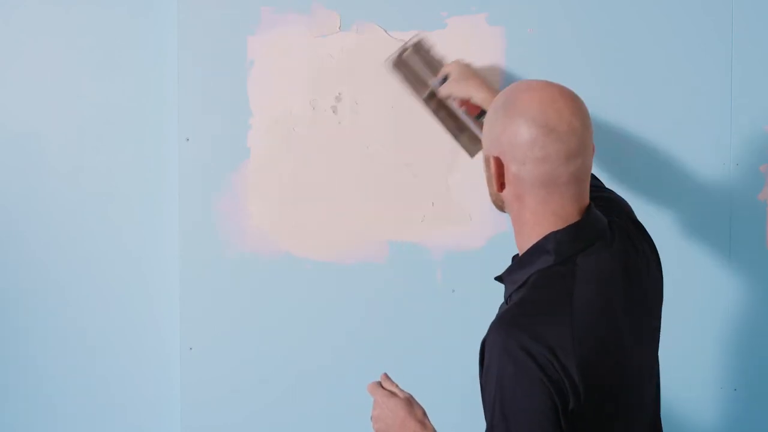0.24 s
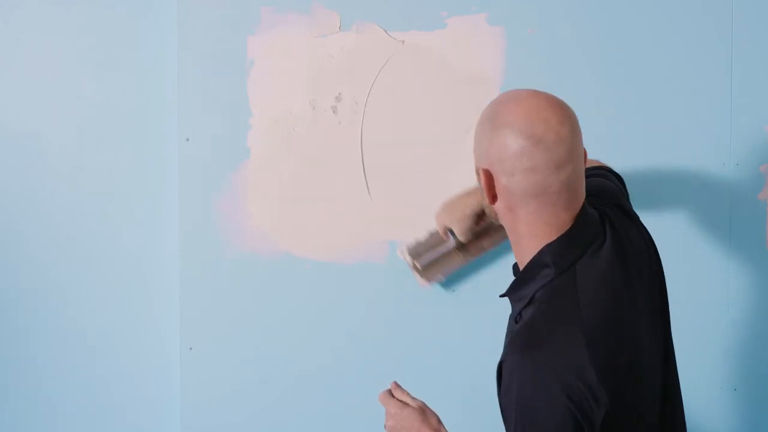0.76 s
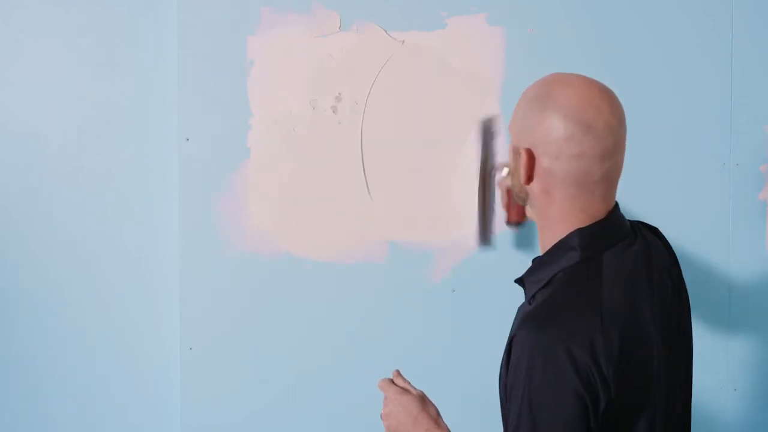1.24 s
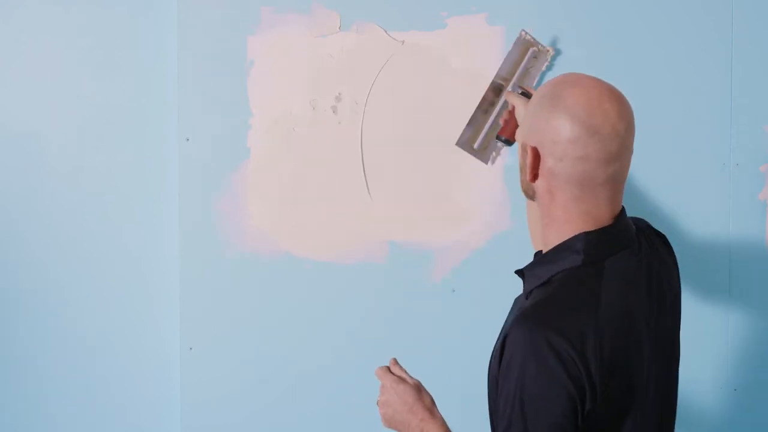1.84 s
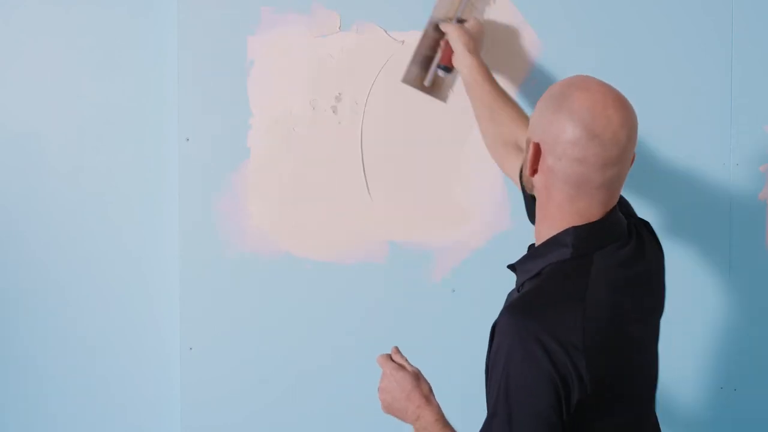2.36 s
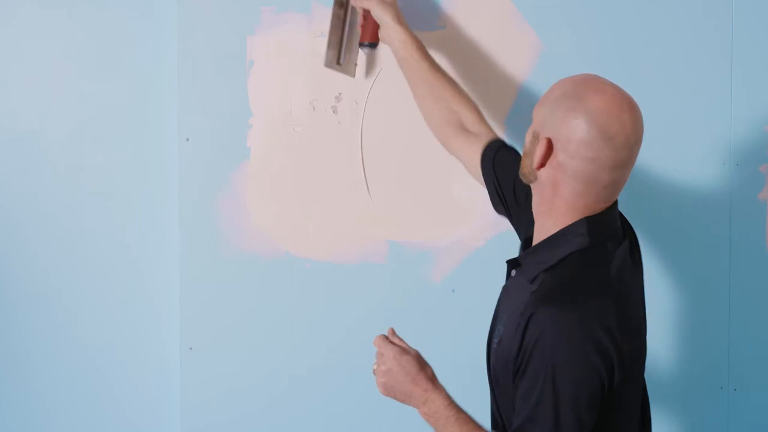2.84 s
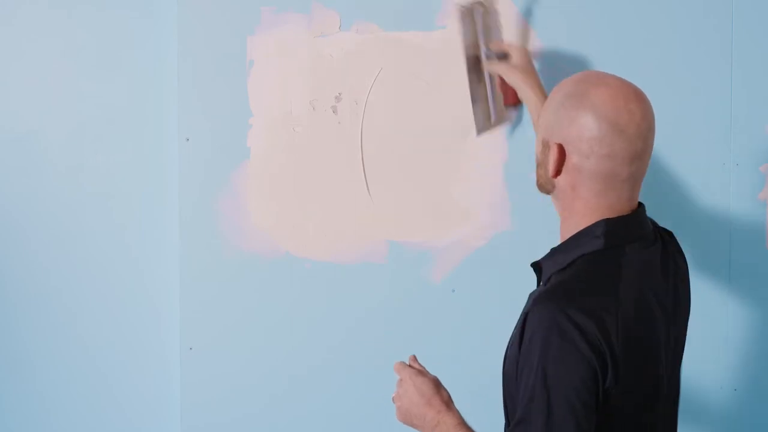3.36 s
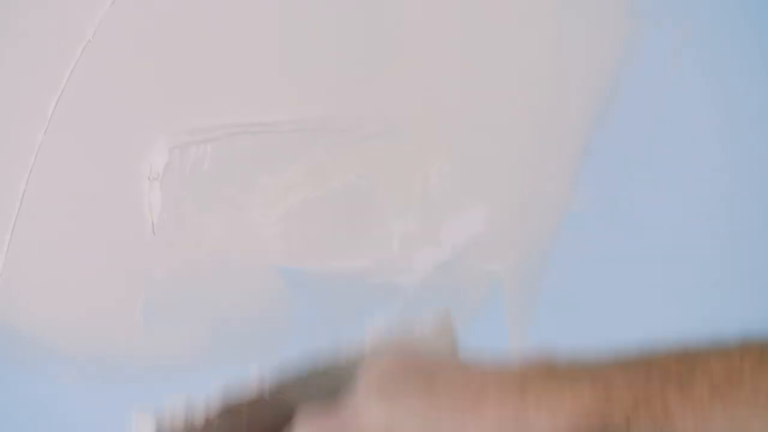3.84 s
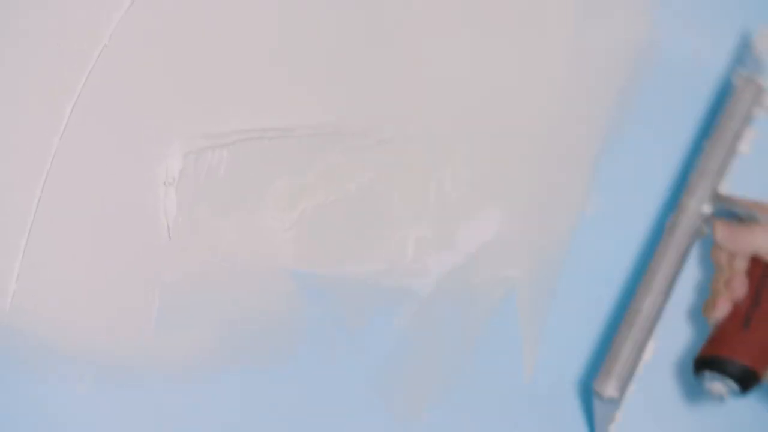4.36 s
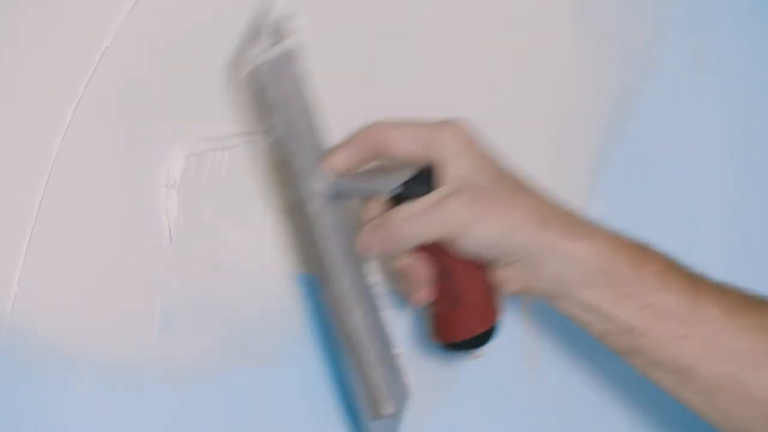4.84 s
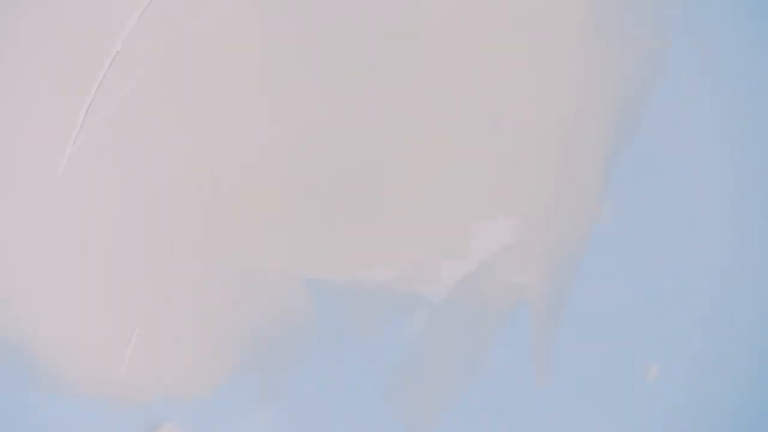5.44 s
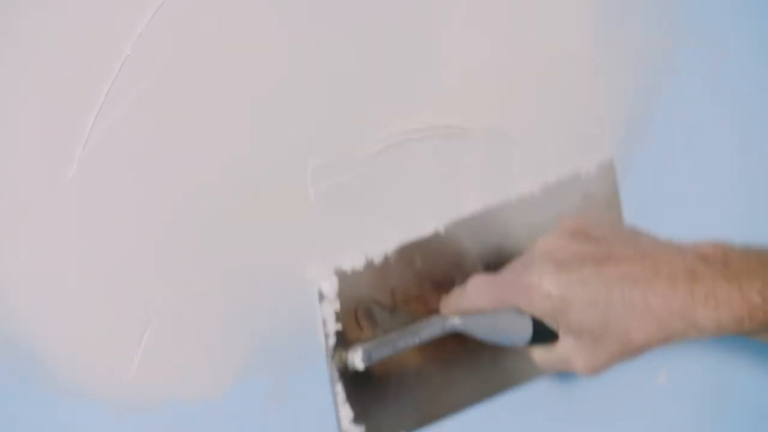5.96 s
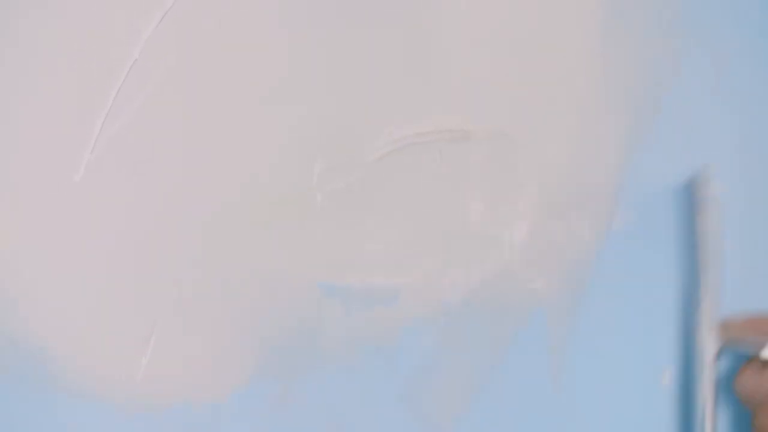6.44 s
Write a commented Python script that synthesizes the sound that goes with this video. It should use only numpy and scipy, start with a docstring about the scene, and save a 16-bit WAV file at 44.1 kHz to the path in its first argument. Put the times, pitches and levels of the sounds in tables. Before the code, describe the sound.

A steel trowel spreads wet plaster over a plasterboard wall, heard in mono in a bare room with short reverberation. It opens with a firm, gritty scrape that rings the blade slightly. Tiny squeaks follow from 0.6 to 0.9 seconds, and a lighter double scrape comes around 1 second. After a lull with faint bubble ticks, the blade clacks on the wall at about 2 seconds and glides softly. A bright rasp with a small squeak comes at 2.7 seconds, then dull board thuds at 2.8 and 3.7. The work gets busier, with strong short scrapes near 4, 4.6, 5.3 and 6.3 seconds and quieter wet glides between. A clack with a hollow rumble lands at 4.5 seconds, a soft thud at 5.9, and a sharp clack with a brief scrape at 6.7. A low ventilation murmur and a very faint electrical whine run underneath.

```python
"""A bare room, where a steel trowel spreads wet joint compound over a plasterboard wall.
Each stroke drags fine grit under the blade; the rasp rings the steel and the wedge of air beneath it.
The blade clacks as it lands, the board thuds and drums, the edge squeaks and small bubbles pop in
the paste. Behind it all sits a low ventilation murmur with a faint electrical whine."""
import sys
import numpy as np
from scipy import signal
from scipy.fft import rfft, irfft, next_fast_len
from scipy.io import wavfile
from scipy.ndimage import map_coordinates

SR = 44100
rng = np.random.default_rng(int(sys.argv[2]) if len(sys.argv) > 2 else 0)


def int16_out(signal):
    """Quantize to a 16-bit WAV file."""
    q = np.round(np.clip(np.atleast_2d(signal).T, -1, 1) * 32767)
    wavfile.write(sys.argv[1], SR, q.astype(np.int16))


N = 295029

# Ringing modes of the steel blade: pitch_hz, level_db, t60_s
BLADE_MODES = [(460, -3, 0.036), (695, -5.5, 0.1), (898, -11, .08), (1099, 1.5, 0.089), (1206, -1, 0.14),
               (1280, -19.5, .07), (1770, -18, .04), (2365, -13, 0.1), (2920, -8, 0.085),
               (3150, -9.5, 0.034), (3800, -10.5, .03), (4600, -13, .03), (5810, -28, .03)]
# The blade bumps the wall: time_s, steel_db, board_db, rise_s, corner_db (re the main blow), drum_db
LANDINGS = [(1.68, -56, -55.5, 0.00063, -18.5, -80.5), (1.9576, -27, -34.5, .0005, -10.5, -46.5),
            (2.818, -56.5, -36, 0.0042, -5.5, -51.5), (3.654, -66, -36, 0.0037, -1.5, -55.5),
            (4.473, -33, -47.5, .002, -12, -38), (5.905, -57.5, -32, 0.0015, -12, -51.5),
            (6.654, -21.5, -43.5, 0.00077, -21.5, -48)]


def amp(db):
    """Decibels to gain."""
    return 10 ** (np.asarray(db) / 20)


def unit(x):
    """Scale to rms 1."""
    return x / np.sqrt(np.mean(x ** 2) + 1e-20)


def along(points, hz):
    """Read a curve of (freq_hz, value) points on a log frequency axis."""
    freqs, values = np.transpose(points)
    return np.interp(np.log(hz + 1), np.log(freqs), values)


def wobble(rate):
    """A smooth random curve, rate knots a second."""
    return map_coordinates(rng.standard_normal(int(N * rate / SR) + 4), [np.arange(N) * rate / SR])


def filtered(x, response):
    """Filter x by a gain given as a function of frequency."""
    size = next_fast_len(N + SR // 2)
    return irfft(rfft(x, size) * response(np.fft.rfftfreq(size, 1 / SR)), size)[:N]


def noise(spectrum):
    """Coloured noise of rms 1."""
    return unit(filtered(rng.standard_normal(N), lambda hz: amp(along(spectrum, hz))))


def add(track, start_s, sound):
    """Mix a sound into a track."""
    part = track[round(start_s * SR):][:len(sound)]
    part += sound[:len(part)]


def scrape(body_hz=1650, fizz_hz=7000):
    """Grit under the blade: wet glides are quiet and fizzy, a biting edge is loud and full-bodied."""
    # Trowel strokes: full_pressure_s, swell_s, hold_s, rasp_db, change_db (over the hold),
    # body_db and fizz_db (both re the rasp), wedge_hz, grip
    strokes = [ (0.0, .02, 0.016, -44.5, -6, 11, -12.5, 1000, "firm"),
               (0.141, 0.091, .135, -18, -16.5, -5, -7, 960, "firm"),
               (0.419, .1, 0.15, -63, 2, -3, -3, 1000, "light"),
               (0.569, 0.022, 0.24, -55.5, 12, -1, -3.5, 990, "light"),
               (0.859, 0.14, 0.078, -29.5, -15, -12, -0.5, 1050, "light"),
               (0.984, 0.14, 0.017, -30.5, 1.5, -7, -13, 1000, "light"),
               (1.941, 0.023, .012, -50.5, 1.5, 7.5, -14.5, 1100, "low"),
               (2, .025, 0.12, -37.5, -18.5, -3, -3, 1010, "light"),
               (2.133, .05, 0.31, -58.5, -9, -2.5, -0.5, 960, "light"),
               (2.439, .045, 0.14, -54, -8, -8, 3.5, 950, "light"),
               (2.623, 0.063, 0.19, -39, -7, -6.5, 3.5, 855, "steep"),
               (2.703, 0.056, 0.1, -21.5, 3.5, -10, -22, 850, "steep"),
               (2.995, 0.11, .27, -65, -5.5, 3, 2.5, 940, "light"),
               (3.449, .008, 0.12, -54.5, -16.5, -6.5, -10, 950, "low"),
               (3.81, 0.26, 0.058, -59, 7, -27, 4, 1100, "flat"),
               (3.924, .058, 0.059, -27, -5.5, -18, -.5, 985, "flat"),
               (4.026, .064, .022, -16, -2, -4.5, -12, 760, "flat"),
               (4.47, 0.01, 0.055, -34.5, 3, 6, -10.5, 900, "firm"),
               (4.555, 0.069, 0.085, -22.5, -.5, -3.5, -5, 850, "firm"),
               (4.679, 0.047, 0.11, -37.5, -8, -4.5, -12, 760, "firm"),
               (4.8, 0.039, 0.02, -37.5, -4, 1, -4.5, 770, "firm"),
               (5, 0.2, 0.45, -39, -13.5, -2, -6.5, 1030, "low"),
               (5.323, 0.084, 0.051, -20, -1, -11, -17.5, 1190, "low"),
               (5.477, 0.077, 0.31, -58, -18, 6, -0.5, 1000, "light"),
               (6.053, 0.092, .06, -52, -32, -18, 3, 980, "flat"),
               (6.232, 0.14, 0.06, -31, -4.5, -39, 2, 935, "flat"),
               (6.298, 0.066, 0.025, -19.5, -1.5, -2, -12, 874, "flat"),
               (6.685, 0.057, .03, -40.5, -1.5, 9, -2, 800, "firm")]
    # Tone of the scrape for each way of holding the blade: freq_hz, level_db
    firm = [(180, -41.5), (300, -19.5), (493, -26), (622, -6), (825, 0), (1170, -0.5), (1630, -4.5),
            (2200, -1.5), (2630, -6), (3160, -3.5), (4120, -7), (6350, -9.5), (7620, -14), (11200, -15),
            (15800, -32)]
    light = [(180, -46), (300, -16.5), (331, -22), (447, -15), (510, -21), (676, -4), (812, -14.5),
             (1060, -7.5), (1470, -7), (1710, -1), (2350, -3), (3160, 0.5), (7250, -5), (10100, -5),
             (15800, -19)]
    steep = [(180, -38), (300, -35.5), (411, -42), (454, -13.5), (493, -36), (622, -15), (1330, -13.5),
             (1400, -8.5), (1830, -13.5), (2270, -6), (3440, -11), (3730, -5.5), (5840, -3.5),
             (11500, -24.5), (15800, -35)]
    flat = [(180, -71), (300, -27), (385, -49.5), (493, -27.5), (723, -4.5), (785, -4.5), (853, -12),
            (958, -10), (1380, -3), (1580, -8), (2310, -0.5), (3490, -2.5), (3860, -0.5), (9770, -9.5),
            (15800, -31)]
    low = [(180, -52), (300, -17), (462, -12), (747, 1.5), (958, -4.5), (1020, -4), (1170, 2), (1770, -7),
           (2050, -3), (2390, -5.5), (3060, -6), (5650, -6), (10400, -18.5), (12500, -27), (15800, -38)]
    # Each grip: colour, lift_db of the air wedge's resonances
    grips = dict(firm=(firm, 1.5), light=(light, 2.5), steep=(steep, 1.6),
                 flat=(flat, 6.8), low=(low, 2.1))
    drag = grit(grains_per_s=4500, grain_db=-2.5, judder_db=0.42)
    hz, t, spectrum = signal.stft(drag, SR, nperseg=512, noverlap=384)
    hz = hz[:, None] + 1
    body = 1 / (1 + (hz / body_hz) ** 10)
    fizz = 1 / (1 + (fizz_hz / hz) ** 10)
    rasp = np.abs(1 - body - fizz)
    scoop_db = -5 * bell(hz, centre_hz=1620, octaves=0.2)
    power = np.zeros(spectrum.shape)
    for full_s, swell_s, hold_s, rasp_db, change_db, body_db, fizz_db, wedge_hz, grip in strokes:
        colour, lift_db = grips[grip]
        age = t - full_s
        level_db = rasp_db + pressure_db(age, swell_s, hold_s, change_db)
        on = level_db > -90
        tilt = np.clip(age[on] / (swell_s + hold_s), -1, 1)
        tone = amp(along(colour, hz) + lift_db * air_wedge(hz, wedge_hz, tilt) + scoop_db) ** 2
        for zone, zone_db in ((body, body_db), (rasp, 0), (fizz, fizz_db)):
            band = zone * tone
            power[:, on] += band / np.mean(band, axis=0) * amp(level_db[on] + zone_db) ** 2
    return signal.istft(spectrum * np.sqrt(power), SR, nperseg=512, noverlap=384)[1][:N]


def grit(grains_per_s, grain_db, judder_db):
    """Particles catch under the edge over a smooth smear; the drag judders."""
    grains = (rng.random(N) < grains_per_s / SR) * rng.standard_normal(N)
    smear = rng.standard_normal(N)
    judder = amp(judder_db * wobble(260) + 1.2 * wobble(45))
    return unit((smear + amp(grain_db) * unit(grains)) * judder)


def pressure_db(age, swell_s, hold_s, change_db, swell_db=21, lift_off_db_per_s=519):
    """A stroke swells until age 0, eases or bears down through the hold, then leaves the wall."""
    swell = swell_db * (np.maximum(-age, 0) / swell_s) ** 1.235  # rounds off towards full pressure
    hold = change_db * np.clip(age / hold_s, 0, 1)
    lift_off = lift_off_db_per_s * np.maximum(age - hold_s, 0)
    return hold - swell - lift_off


def bell(hz, centre_hz, octaves):
    """A bell curve of height 1 on a log frequency axis."""
    return np.exp(-.5 * (np.log2(hz / centre_hz) / octaves) ** 2)


def air_wedge(hz, wedge_hz, tilt, fall_octaves=0.38, width_octaves=0.12):
    """The air under the blade has two resonances with a null between; all fall as the blade tilts."""
    lower_hz = wedge_hz * 2 ** (-fall_octaves * tilt)
    upper_hz = 2.95 * lower_hz  # as in a tube closed at one end
    resonances = bell(hz, lower_hz, width_octaves) + bell(hz, upper_hz, width_octaves)
    return resonances - bell(hz, 1.9 * lower_hz, width_octaves)


def blade_ring(drive):
    """The steel's modes, kept ringing by the scrape."""
    def resonance(hz, pitch_hz, t60_s):
        width_hz = np.log(1000) / (np.pi * t60_s)
        loss = 1j * hz * width_hz
        return loss / (pitch_hz ** 2 - hz ** 2 + loss)
    return filtered(drive, lambda hz: sum(amp(db) * resonance(hz, pitch_hz, t60_s)
                                          for pitch_hz, db, t60_s in BLADE_MODES))


def landings():
    """The blade clacks on the wall with a wet slap and the board thuds, four quick contacts each time."""
    # Modes of the plasterboard: pitch_hz, level_db, t60_s
    board_modes = [(90, -11.5, 0.12), (110.4, -5.5, 0.37), (145.2, -3.5, 0.15), (188, -8.5, 0.051),
                   (207, -2.5, 0.12), (278, -13.5, 0.086), (359, -18, 0.039)]
    out, t = np.zeros(N), np.arange(SR // 3) / SR

    def burst(band_hz, level_db, t60_s):
        hiss = signal.lfilter(*signal.butter(3, band_hz, "band", fs=SR), rng.standard_normal(len(t)))
        return unit(hiss) * amp(level_db - 60 * t / t60_s)

    for time_s, steel_db, board_db, edge_rise_s, corner_db, _ in LANDINGS:
        contacts = [(-.022, corner_db, .0025),  # one corner touches first
                    (0, 0, edge_rise_s),  # the whole edge
                    (.0045, -5, edge_rise_s),  # the heel follows
                    (.033, -13.5, edge_rise_s)]  # the rebound
        for delay_s, contact_db, rise_s in contacts:
            slap = burst(band_hz=(983, 4300), level_db=-4, t60_s=0.026)
            knock = burst(band_hz=(203, 623), level_db=0.5, t60_s=0.06)  # handle and board face
            clack = struck(BLADE_MODES, t, attack_s=.0003, damping=2.8) + slap + knock
            thud = struck(board_modes, t, attack_s=.00085, damping=2.1)
            onset = 1 - np.exp(-(t / rise_s) ** 2)  # paste cushions the contact
            blow = amp(steel_db) * clack + amp(board_db) * thud
            add(out, time_s + delay_s, amp(contact_db) * onset * blow)
    return out


def struck(modes, t, attack_s, damping):
    """Modes rung at new strengths by each blow; paste and hand shorten their decay."""
    ring = np.zeros(len(t))
    for pitch_hz, level_db, t60_s in modes:
        decay = amp(level_db + rng.normal(0, 1.0) - 60 * damping * t / t60_s)
        ring += decay * np.sin(2 * np.pi * (pitch_hz * t + rng.random()))
    return ring * (1 - np.exp(-t / attack_s))


def drumming(delay_s=.025, rise_s=.023, fade_db_per_s=90.5):
    """The hollow wall rumbles as the arm's weight arrives just after each landing, then settles."""
    # Tone of the wall's rumble: freq_hz, level_db
    rumble_colour = [(30, -46), (60, -16), (100, 8), (200, -1.5), (350, -7), (550, -22), (900, -27.5)]
    push = np.zeros(N)
    for time_s, *_, drum_db in LANDINGS:
        age = np.arange(N) / SR - time_s - delay_s
        swell = np.exp(np.minimum(age, 0) / rise_s)
        push += swell * amp(drum_db - fade_db_per_s * np.maximum(age, 0))
    return amp(-1) * push * noise(rumble_colour)


def squeaks():
    """The edge chatters on thin paste: short stick-slip notes of unsteady pitch."""
    # Squeaks: centre_s, pitch_hz, level_db, half_width_s
    notes = [(0.596, 987, -51, 0.016), (0.635, 982, -45.5, 0.02), (0.668, 1040, -55, 0.03),
             (0.785, 1703, -41, 0.02), (0.795, 540, -41, 0.0089), (0.894, 444.4, -44, 0.018),
             (2.672, 726, -38.5, 0.04)]
    out, t = np.zeros(N), np.arange(N) / SR
    waver = .7 * wobble(240)
    for centre_s, pitch_hz, level_db, half_width_s in notes:
        on = np.abs(t - centre_s) < 2 * half_width_s
        envelope = amp(level_db) * np.exp(-2 * ((t[on] - centre_s) / half_width_s) ** 2)
        out[on] += envelope * np.sin(2 * np.pi * pitch_hz * t[on] + waver[on])
    return amp(1.5) * out


def bubble_pops(t60_s=.016):
    """Tiny bubbles burst in the paste, each a bright tick of noise; the tick at 1.68 s sharpens the blade's
    light tap."""
    # Bubbles: start_s, level_db (the tick at 1.6847 s belongs to the blade's light tap)
    bubbles = [(0.5676, -40), (1.0964, -38.5), (1.45, -55.5), (1.6114, -55.5), (1.6847, -39), (2.3206, -50),
               (3.0025, -53), (3.6282, -42), (3.7823, -41), (6.5161, -38)]
    colour = [(300, -8.5), (2500, -5), (6000, -7.5), (10000, 6), (15000, -6)]  # freq_hz, gain_db
    out, t = np.zeros(N), np.arange(SR // 30) / SR
    for start_s, level_db in bubbles:
        add(out, start_s, amp(level_db - 60 * t / t60_s) * rng.standard_normal(len(t)))
    return amp(-9) * filtered(out, lambda hz: amp(along(colour, hz)))


def room(x, predelay_s=.004):
    """Direct sound plus the tail of a bare room, which rings longest in the mids."""
    # Decay of the room: freq_hz, t60_s
    decay_times = [(150, 0.25), (600, 0.75), (1400, 0.53), (3700, 0.62), (9000, 0.54), (15000, 0.28)]
    # Tone of the tail: freq_hz, wet_db
    tail_colour = [(150, -7), (450, -2.5), (750, -13.5), (1600, -5.5), (2300, -9), (5000, -9.5),
                   (9000, -10.5), (15000, -9.5)]
    hz, t, spectrum = signal.stft(rng.standard_normal(SR), SR, nperseg=256)
    t60_s = along(decay_times, hz)[:, None]
    decay = amp(-60 * t / t60_s) * np.sqrt(2 * np.log(1000) / (t60_s * SR))  # unit energy in each band
    wet = amp(along(tail_colour, hz))[:, None]
    tail = signal.istft(spectrum * decay * wet, SR, nperseg=256)[1]
    return x + signal.fftconvolve(x, np.pad(tail, (round(predelay_s * SR), 0)))[:N]


def room_tone(murmur_db=-62):
    """A low ventilation murmur with faint electrical tones."""
    # Tone of the ventilation: freq_hz, level_db
    vent_colour = [(20, -35), (45, -20), (80, -7), (125, -1.5), (190, -7), (300, -12), (450, -19),
                   (800, -23.5), (1200, -24.5), (2000, -26.5), (3500, -29.5), (7000, -36.5), (10000, -34),
                   (15800, -52.5)]
    # Electrical tones: pitch_hz, rms_db
    tones = [(134.6, -75), (3601, -90), (5701, -86), (6002, -93), (8253, -90.5), (9001, -98.5)]
    t = np.arange(N) / SR
    whine = sum(np.sqrt(2) * amp(db) * np.sin(2 * np.pi * hz * t + .4 * wobble(5)) for hz, db in tones)
    murmur = amp(murmur_db + 1.2 * wobble(12)) * noise(vent_colour)
    return murmur + whine


def scene():
    """Trowel and wall heard in the room by one microphone."""
    rasp = amp(-3) * scrape()
    trowel = rasp + amp(-5) * blade_ring(rasp) + squeaks() + landings() + bubble_pops() + drumming()
    mono = room(trowel) + room_tone()
    return np.array([mono, mono])


def record(dry):
    """The microphone rolls off the deep bass; the very top is cut away."""
    low_cut_hz, top_hz = 52, 15900
    lean = signal.sosfilt(signal.butter(3, low_cut_hz, "high", fs=SR, output="sos"), dry)
    return np.array([filtered(channel, lambda hz: hz < top_hz) for channel in lean])


dry = scene()
out = record(dry)
int16_out(out)
```